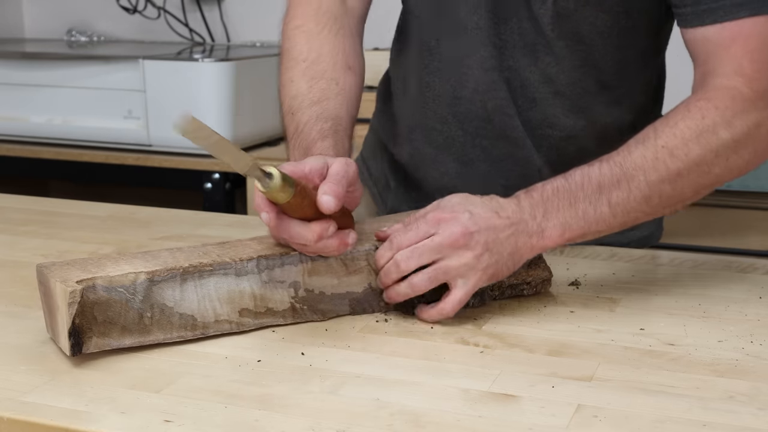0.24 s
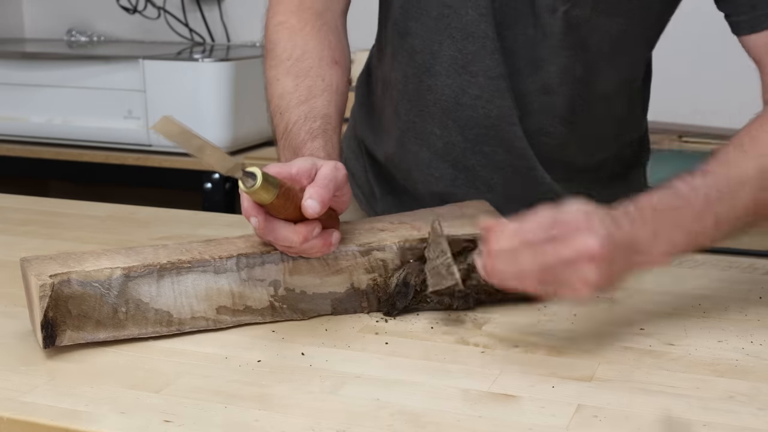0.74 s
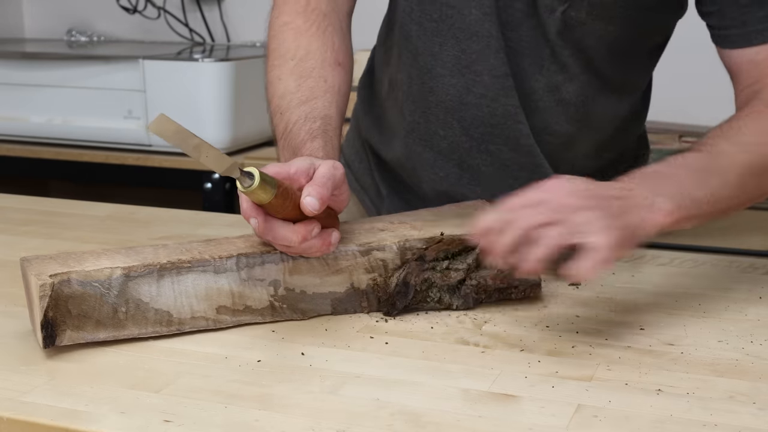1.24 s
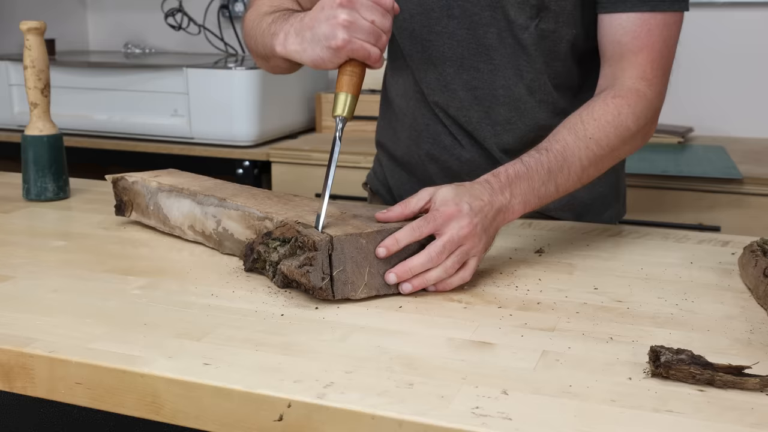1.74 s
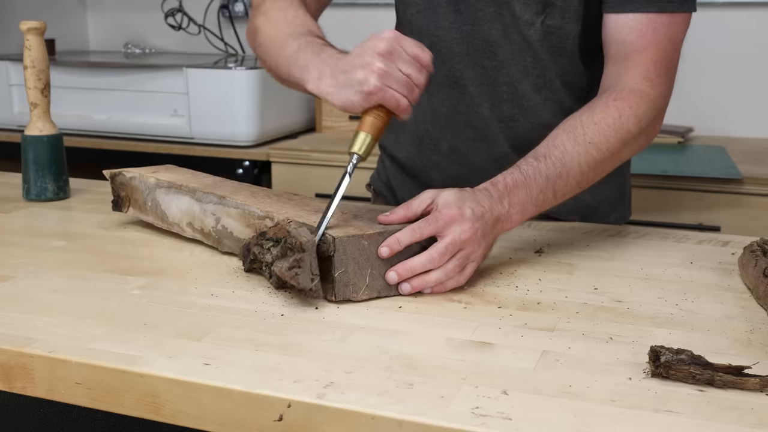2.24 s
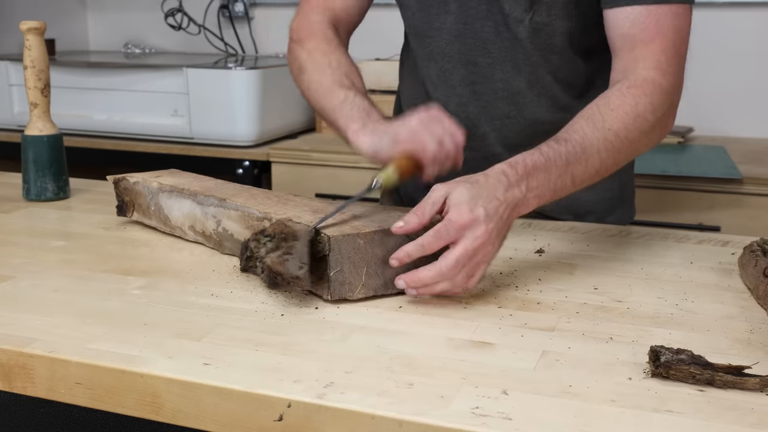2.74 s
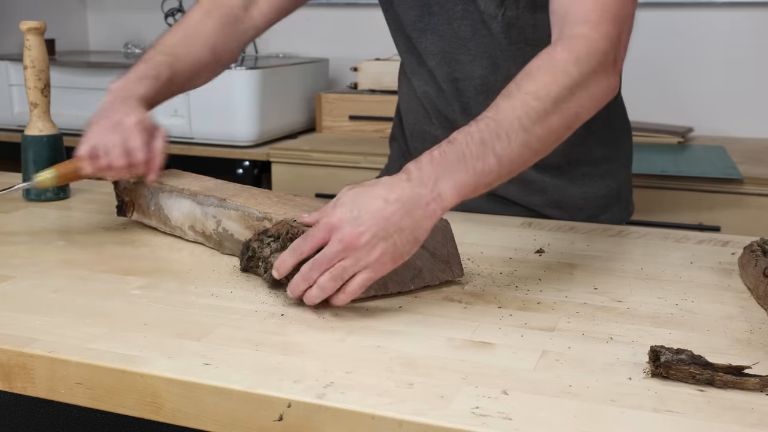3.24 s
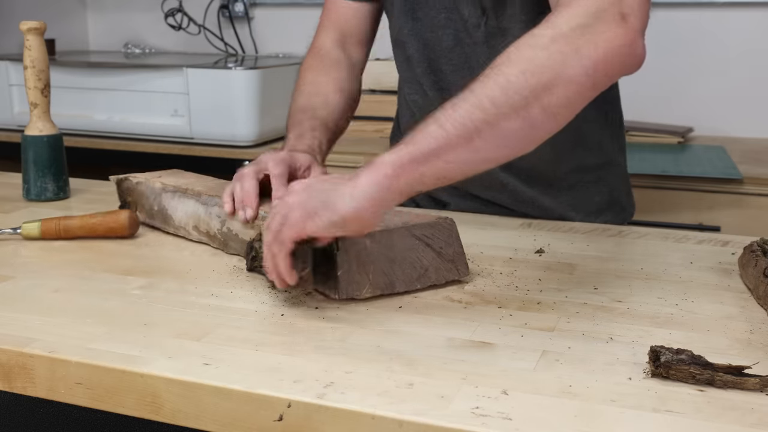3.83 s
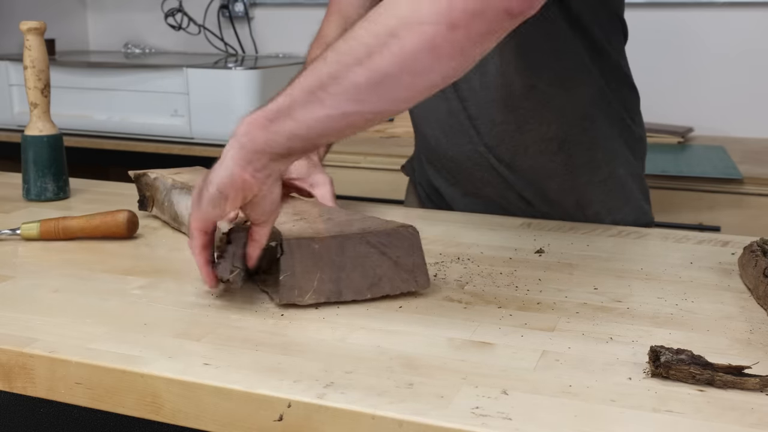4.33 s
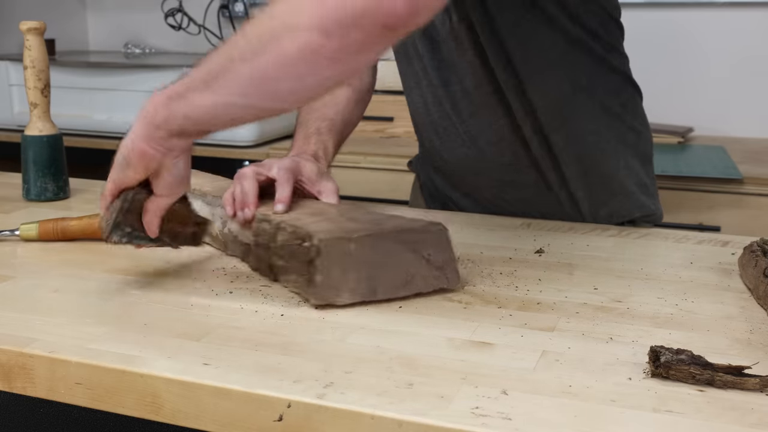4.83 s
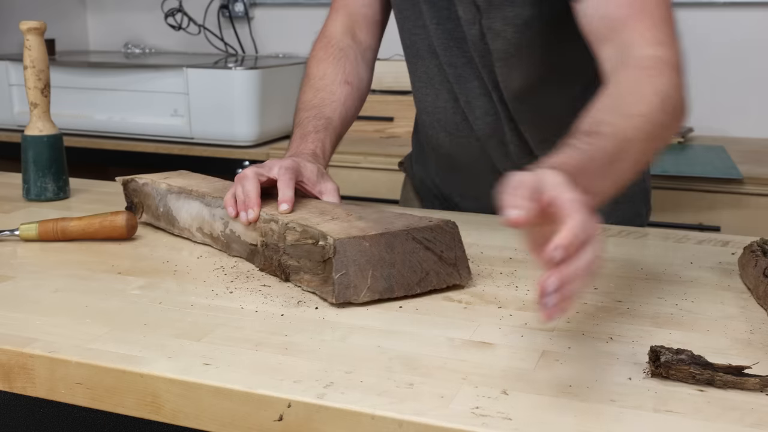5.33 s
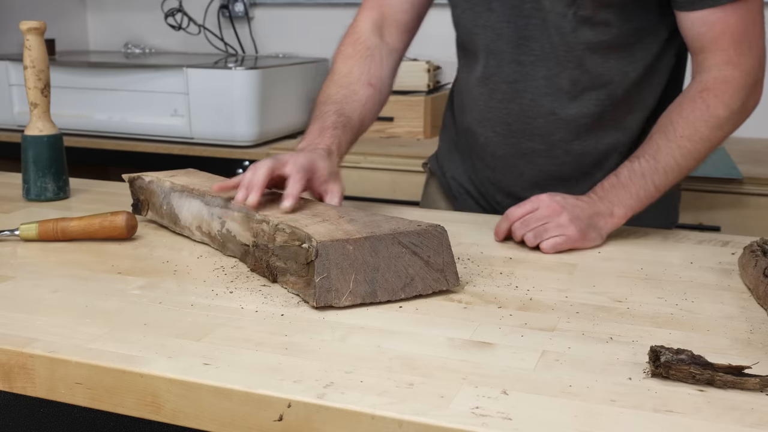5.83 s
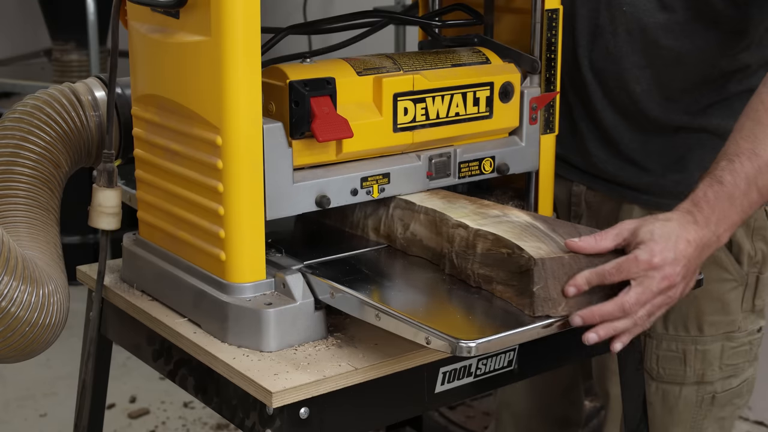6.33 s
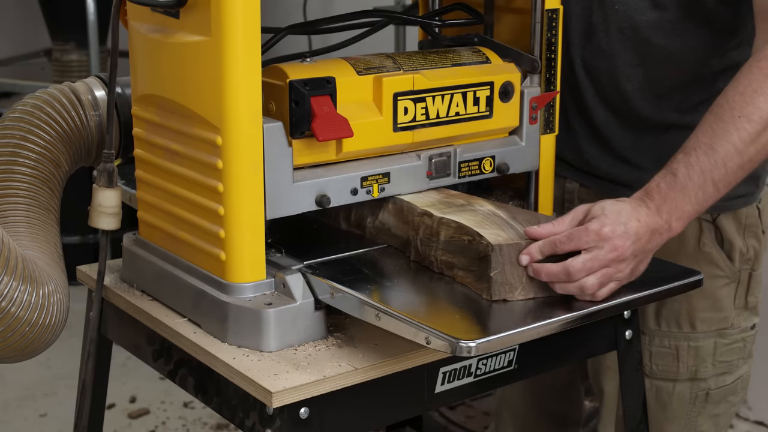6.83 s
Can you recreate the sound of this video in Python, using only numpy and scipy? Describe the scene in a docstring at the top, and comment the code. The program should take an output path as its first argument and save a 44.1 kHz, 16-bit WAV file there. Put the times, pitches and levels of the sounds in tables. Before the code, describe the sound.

In a quiet workshop, heard close up, hands rub over a log and bark breaks off with sharp, dry snaps at about 0.6 seconds. From 1.5 to 1.8 seconds the log knocks on a wooden workbench, with two small ticks of a steel chisel. A longer crackling, splintering tear follows from 2.1 to 2.5 seconds, trailing crumbs. Around 3.4 to 3.9 seconds the chisel is put down and rocks with wooden knocks and a faint ring of the blade. Light scraping leads to another loud crack of bark at 4.7 seconds, then a faint squeak of skin on wood. At 5.7 seconds the tossed piece clatters on something hollow, as a thickness planer comes in with a motor whine and rushing air. At 6 seconds the log clunks in with a short squeal, and the whine sinks in pitch under load until the end, at about 7 seconds.

```python
"""Bark torn off a log, then a thickness planer

Bark is torn by hand and levered with a chisel off a log on a wooden workbench, close by.
Fibres snap and crumble as shaped noise bursts; log, chisel and a tossed slab ring as decaying modes.
Then a thickness planer comes in: harmonics of a shaft that slows as it takes the log, over rushing air."""
import sys
import numpy as np
from scipy import signal
from scipy.fft import rfft, irfft
from scipy.io import wavfile
from scipy.ndimage import uniform_filter1d

SR = 44100
rng = np.random.default_rng(int(sys.argv[2]) if len(sys.argv) > 2 else 0)


def unload_wav(signal):
    """Save mono or channel-first audio to the path in sys.argv[1] as 16-bit WAV at rate SR, clipped to [-1, 1]."""
    wavfile.write(
        sys.argv[1],
        SR,
        np.round(np.clip(np.atleast_2d(signal).T, -1, 1) * 32767).astype(np.int16),
    )


N = 311787
TIME = np.arange(N) / SR
AGE = np.arange(SR // 2) / SR  # time since a blow [s]
TOP_HZ = 16000  # upper limit of the sound
CONTACT_DB = -19  # click of a hard contact against the nominal level of its blow

# modes of the log on the bench: (frequency [Hz], level [dB], t60 [s])
BENCH_MODES = [(142, -12.5, 0.23), (205, -12.5, 0.065), (265, -8.5, 0.17), (325, 1, 0.2),
               (431.6, -2, 0.069), (465, -11.5, 0.5), (490.2, -6.5, 0.22), (662, -8, 0.12), (858, -2, 0.21),
               (1000, -11, 0.11), (1108, -7, 0.078)]
# dense higher modes of the timber: (frequency [Hz], level [dB])
TIMBER = [(40, -41), (200, -10.5), (500, -7), (1000, -5), (1400, -7), (2200, -10.5), (3500, -16),
          (7000, -29), (16000, -38.5)]


def undb(db):
    """Logarithmic level: decibels to amplitude gain."""
    return 10 ** (np.asarray(db) / 20)


def unit(x, seconds=None):
    """Effective value: scale to rms 1, over the whole sound or over its first moments."""
    end = int(seconds * SR) if seconds else None
    return x / np.sqrt(np.mean(x[:end] ** 2))


def add(out, s, x):
    """Superposition: mix x into out from time s."""
    i = max(int(s * SR), 0)
    out[i:i + len(x)] += x[:len(out) - i]


def fade(t60):
    """Exponential damping: a fall of 60 dB in t60 seconds."""
    return np.exp(-np.log(1000) * AGE / t60)


def rise(seconds):
    """Finite contact time: a smooth onset."""
    return 1 - np.exp(-(AGE / seconds) ** 2)


def colour(x, points, tilt_db=0):
    """Minimum-phase filtering through (Hz, dB) points, tilted in dB per octave."""
    hz, db = np.transpose(points)
    octave = np.log2(np.maximum(np.fft.rfftfreq(4096, 1 / SR), 10))
    level_db = np.interp(octave, np.log2(hz), db) + tilt_db * (octave - octave.mean())
    cepstrum = irfft(level_db * np.log(10) / 20)
    # folding the cepstrum onto positive times makes the filter causal
    half = len(cepstrum) // 2
    cepstrum[1:half] *= 2
    cepstrum[half + 1:] = 0
    impulse_response = irfft(np.exp(rfft(cepstrum)))
    return signal.fftconvolve(x, impulse_response)[:len(x)]


def lowpass(x, hz, order=2):
    """Maximally flat (Butterworth) low-pass."""
    return signal.sosfilt(signal.butter(order, min(hz, TOP_HZ), fs=SR, output="sos"), x)


def highpass(x, hz, order=2):
    """Maximally flat (Butterworth) high-pass."""
    return signal.sosfilt(signal.butter(order, hz, "high", fs=SR, output="sos"), x)


def ring(modes, scatter_db=2):
    """Modal superposition: each blow varies the strength, sign and slightly the pitch of every mode."""
    out = 0
    for hz, db, t60 in modes:
        strength = undb(db + scatter_db * rng.standard_normal()) * rng.choice([-1, 1])
        pitch = hz * (1 + 0.0048 * rng.standard_normal())
        out = out + strength * fade(t60) * np.sin(2 * np.pi * pitch * AGE)
    return out


def burst(t60, tail_t60, tail_db):
    """Double decay: a sharp burst of noise plus a longer tail at its own level."""
    return rng.standard_normal(len(AGE)) * (fade(t60) + undb(tail_db) * fade(tail_t60))


def walk(rate, n=N):
    """Band-limited chance: smoothed random steps with a spread near 1, n samples long."""
    k = int(SR / rate)
    steps = np.repeat(rng.standard_normal(n // k + 2), k)
    return np.sqrt(20 / 11) * uniform_filter1d(uniform_filter1d(steps, k), k)[:n]


def cracks():
    """Brittle fracture: a snap of milliseconds with a bright tick sets the slab ringing."""
    # bark snapping: (time [s], relative strength [dB], extra brightness [dB])
    fractures = [(0.5783, -23, 0), (0.593, -18.5, 2.5), (0.6025, -11.5, -4), (0.6195, -1, 4.5),
                 (0.632, -4, 8.5), (0.6575, -6, 6), (0.7299, -23, -9), (1.0807, -28, -0.5),
                 (1.157, -36.5, 3), (1.2659, -15.5, -5), (1.275, -28.5, -12), (2.1306, -13.5, -6),
                 (2.2822, -7, -10.5), (2.308, -7.5, 2.5), (2.319, -10, 0), (2.3581, -12.5, -0.5),
                 (2.3787, -8, 2.5), (2.3872, -1.5, 2.5), (2.4687, -6.5, 12), (2.4985, -4, -7.5),
                 (2.6476, -24, 3), (3.328, -31.5, 1.5), (3.632, -15, -1), (4.006, -27.5, 4.5),
                 (4.0874, -22.5, 5), (4.125, -26, 13), (4.1492, -29.5, 10), (4.3882, -40.5, 7.5),
                 (4.6209, -8, 0.5), (4.6485, -4.5, 11), (4.6777, 0, -10.5), (4.6948, -10, -2),
                 (4.74, -15.5, 11.5)]
    # colours of the breaking fibres: (frequency [Hz], level [dB])
    snap_colour = [(300, -36), (900, -16), (1500, -7.5), (2500, -1), (4500, -2), (6500, -7.5), (9000, -16),
                   (16000, -31.5)]
    tick_colour = [(2000, -25), (5000, -14), (7500, 4), (11000, 6), (16000, -4.5)]
    # a half-freed slab of bark: (frequency [Hz], level [dB], t60 [s])
    slab_modes = [(1172, 1, 0.038), (1150, -10, 0.023), (2440, -0.5, 0.021), (3894, -3, 0.011)]
    # at strength 0 dB, and dB per dB of strength: the tick shrinks less than the snap in small cracks
    tick_base_db, tick_growth = -27, 0.52
    ring_base_db, ring_growth = -30.5, 0.95
    free_slab_s, free_slab_db = 3.0, 11  # from here the slab is prised clear and rings this much louder
    out = np.zeros(N)
    for s, db, bright_db in fractures:
        snap = colour(burst(t60=0.0045, tail_t60=0.033, tail_db=-17.5) * rise(0.00037), snap_colour)
        snap = unit(snap, 0.00051) * undb(db - 14.0)
        tick = colour(burst(t60=0.007, tail_t60=0.016, tail_db=-15.5) * rise(0.00042), tick_colour)
        tick = unit(tick, 0.0013) * undb(tick_base_db + tick_growth * db + bright_db)
        ring_db = ring_base_db + ring_growth * db
        if s < free_slab_s:  # bark that still clings to the log gives a dull crunch with no clear pitch
            crunch = rng.standard_normal(len(AGE)) * fade(t60=0.037)
            slab = highpass(lowpass(crunch, 880), 1000, order=4)
        else:
            slab = ring(slab_modes)
            ring_db += free_slab_db
        add(out, s, snap + tick + unit(slab, 0.014) * undb(ring_db))
    return out


def crumbling():
    """Friction and tearing: rubbing loosens grit; a tear breaks more and leaves a dying trickle."""
    # fingers and blade rubbing over the bark: (start [s], end [s], level [dB], tilt [dB per octave])
    rubs = [(0.02, 0.285, -63.5, 2.5), (0.363, 0.424, -52, 0), (1.029, 1.16, -50, 2.5),
            (1.219, 1.277, -45.5, -2.5), (2.001, 2.044, -41, -6.5), (2.066, 2.157, -43, -1),
            (2.556, 2.763, -44, 1), (2.818, 2.884, -51.5, 4), (4.073, 4.271, -49, 8.5),
            (4.382, 4.502, -56.5, 9), (4.746, 4.873, -47.5, 0.5), (4.868, 4.929, -46, -3),
            (4.953, 5.021, -49, -2.5)]
    # strips of bark tearing loose: (start [s], end [s], level [dB])
    tears = [(0.629, 0.676, -27.5), (2.28, 2.515, -29.5), (4.681, 4.713, -23), (1.24, 1.28, -47.5)]
    tear_tilt_db = 0.8  # per octave
    # crumbs after each tear: length, overlap with its end, level before the fade
    trickle_s, trickle_lead_s, trickle_db = 0.072, 0.013, -47
    trickle_fade_db_per_s = 69.5
    out = np.zeros(N)
    for start, end, db, tilt_db in rubs:
        add(out, start, crumble(end - start, db, tilt_db, hiss=0.06))
    for start, end, db in tears:
        add(out, start, crumble(end - start, db, tear_tilt_db))
        add(out, start, splinters(end - start, db))
        trickle = crumble(trickle_s, trickle_db, tear_tilt_db)
        dying = undb(-trickle_fade_db_per_s * TIME[:len(trickle)])
        add(out, end - trickle_lead_s, trickle * dying)
    return out


def crumble(seconds, db, tilt_db, hiss=0.012):
    """Shot noise: tiny fractures ring flakes, in clumps as the bark gives way; the log rumbles low."""
    # colour of the crumbs: (frequency [Hz], level [dB])
    crumb_colour = [(200, -24), (700, -6.5), (1200, 1.5), (1750, -2), (2500, 2), (4500, -4), (7000, -3.5),
                    (11000, -15), (16000, -16)]
    n = int(max(seconds, .01) * SR)
    pressure = undb(3.9 * walk(110, n))
    rate = 1000 * undb(0.24 * (db + 27.5))  # harder tearing breaks more fibres a second, for each flake
    grit = 0
    for _ in range(3):
        size = np.minimum(rng.exponential(size=n), 4.5)
        grains = (rng.random(n) < rate / SR) * undb(3.5 * size) * rng.choice([-1, 1], n)
        flake = rng.standard_normal(len(AGE)) * fade(t60=0.0069)
        excitation = (grains + hiss * rng.standard_normal(n)) * pressure
        grit = grit + signal.fftconvolve(excitation, flake)[:n]
    swell = signal.windows.tukey(n, .4) * undb(db)
    rumble = lowpass(signal.fftconvolve(grit, ring(BENCH_MODES))[:n], 230)
    mixed = unit(colour(grit, crumb_colour, tilt_db)) + undb(-9.5) * unit(rumble)
    return highpass(mixed, 110) * swell


def splinters(seconds, db):
    """Independent fractures: fibres break at uneven moments, each with its own pitch and size."""
    per_second, level_db, scatter_db = 96, -0.5, 5.5  # rate, level against the tear, spread
    low_hz, high_hz, cycles = 1040, 8100, 36  # range of pitches; cycles in a 60 dB decay
    out = np.zeros(len(AGE))
    for when, length, size in rng.random((int(seconds * per_second), 3)):
        hz = high_hz * (low_hz / high_hz) ** length
        tone = np.sin(2 * np.pi * hz * AGE)
        snap = (tone + .5 * rng.standard_normal(len(AGE))) * fade(cycles / hz)
        add(out, when * seconds, snap * undb(db + level_db - scatter_db * np.log(size + 0.085)))
    return out


def knocks():
    """Impact excitation: the log knocks on the bench with a click; hands press it with dull thuds."""
    # the log striking the bench: (time [s], relative level [dB], contact hardness as a cut-off [Hz])
    strikes = [(0.387, -41.5, 1374), (0.658, -37, 1334), (1.267, -47, 2400), (1.514, -29.5, 2380),
               (1.529, -15, 1326), (1.678, -25, 1354), (1.689, -28.5, 1630), (1.767, -23.5, 1880),
               (2.088, -32.5, 1505), (2.387, -24, 1100), (2.498, -27.5, 1000), (4.682, -28, 733),
               (5.207, -43.5, 596)]
    # hands pressing the log and leaning on the bench: (time [s], relative level [dB], softness as a cut-off [Hz])
    thuds = [(0.277, -30, 264), (0.676, -29.5, 268), (0.774, -48, 70), (1.039, -34, 270), (1.800, -41, 129),
             (2.025, -28.5, 180.5), (2.085, -28.5, 220), (2.111, -24.5, 268), (2.720, -37, 158),
             (2.852, -43, 116), (3.603, -25.5, 217), (4.391, -37, 331.9), (4.709, -21, 297),
             (4.746, -27.5, 153), (5.528, -42, 400), (5.596, -37.5, 200)]
    out = np.zeros(N)
    for s, db, contact_hz in strikes:
        click = contact() * undb(db + CONTACT_DB)
        add(out, s, blow(BENCH_MODES, timber(), db, contact_hz) + click)
    for s, db, contact_hz in thuds:
        add(out, s, blow(BENCH_MODES, timber(), db, contact_hz))
    return out


def contact():
    """Hard impact: the brief click of two surfaces meeting."""
    click = burst(t60=0.0038, tail_t60=0.06, tail_db=-13.5)
    return unit(lowpass(click, 4170, order=3), 0.00094)


def timber():
    """High modal density: the upper modes of the wood around one striking place merge into noise."""
    brief = rng.standard_normal(len(AGE)) * fade(t60=0.011)
    lingering = lowpass(rng.standard_normal(len(AGE)), 2600) * fade(t60=0.18)
    return unit(colour(brief + undb(-11.0) * lingering, TIMBER), 0.016)


def blow(modes, upper, db, contact_hz):
    """Contact time sets bandwidth: a soft blow builds up slowly and reaches mainly the low modes."""
    body = unit(ring(modes), 0.02) + undb(-1.5) * upper
    body = body * (0.67 + fade(t60=0.06))  # much of the force is lost at once, the rest rings on
    softened = lowpass(body * rise(.5 / contact_hz), contact_hz, order=3)
    heard = highpass(softened, min(contact_hz / 2.7, 170))
    return unit(heard, .02) * undb(db - 5.0)


def chisel():
    """Coupled resonators: the edge pings on the log; put down, the handle rocks and jolts the blade."""
    # the steel edge touches the wood: (time [s], frequency [Hz], level [dB])
    pings = [(1.515, 4340, -34.5), (1.689, 5250, -24)]
    # the chisel put down and rocking: (time [s], relative level [dB], hardness as a cut-off [Hz], blade ring [dB])
    set_down = [(3.439, -19.5, 1020, -53), (3.633, -7, 2600, -40.5), (3.712, -18.5, 1600, -50.5),
                (3.724, -14, 1440, -45), (3.789, -9.5, 1310, -46.5), (3.796, -15, 1340, -33),
                (3.819, -15.5, 1200, -55.5), (3.842, -13.5, 1170, -41.5)]
    # handle on the bench, and blade: (frequency [Hz], level [dB], t60 [s])
    handle_modes = [(732, -5.5, 0.11), (771, -1, 0.16), (1330, -2.5, 0.049), (1484, -7.5, 0.044)]
    blade_modes = [(3184, 3.5, 0.12), (4720, -10.5, 0.15), (4880, -7, 0.1), (6860, -12, 0.07),
                   (11950, -13, 0.046)]
    out, upper = np.zeros(N), timber()
    for s, hz, db in pings:
        tone = np.sin(2 * np.pi * hz * AGE) * fade(t60=0.011)
        add(out, s, undb(db) * (tone + undb(-6) * highpass(contact(), 4400)))
    for s, db, contact_hz, blade_db in set_down:
        knock = blow(list(BENCH_MODES) + list(handle_modes), upper, db, contact_hz)
        click = contact() * undb(db + CONTACT_DB)
        add(out, s, knock + click + undb(blade_db) * ring(blade_modes))
    return out


def squeak():
    """Stick-slip friction: skin on smooth wood gives a rough, sliding tone and a weaker, lower partner."""
    # a hand on the wood: (time [s], pitch [Hz], level of the main tone [dB])
    glide = [(5.02, 4820, -68), (5.081, 5080, -54.5), (5.114, 4690, -63), (5.19, 4420, -66)]
    s, hz, db = np.transpose(glide)
    t = np.arange(s[0], s[-1], 1 / SR)
    phase = 2 * np.pi * np.cumsum(np.interp(t, s, hz)) / SR

    def rough(ratio):
        """Random amplitude modulation broadens a tone."""
        return unit(lowpass(rng.standard_normal(len(t)), 283) * np.sin(ratio * phase))

    tones = rough(1) + undb(-8.5) * rough(0.64)
    out = np.zeros(N)
    add(out, s[0], tones * undb(np.interp(t, s, db)) * signal.windows.tukey(len(t), .2))
    return out


def landing():
    """Repeated impact: the tossed slab bounces and clatters on something hollow, which rings."""
    # blows of the slab: (time [s], relative level [dB])
    bounces = [(5.6854, -20.5), (5.693, -5.5), (5.701, -3), (5.719, -12.5)]
    # the hollow body: (frequency [Hz], level [dB], t60 [s])
    hollow_modes = [(172, 2.5, 0.34), (316, 9.2, 0.084), (1247, 9.1, 0.096), (1452, 8.3, 0.15)]
    # colour of the clatter: (frequency [Hz], level [dB])
    clatter_colour = [(80, -34), (180, -8), (320, -4.5), (420, -20), (800, -2.5), (1400, 2), (2300, -6.5),
                      (3000, -16.5), (4200, -9), (8000, -18), (16000, -35)]
    out = np.zeros(N)
    for s, db in bounces:
        clatter = colour(burst(t60=0.035, tail_t60=0.29, tail_db=-4.5), clatter_colour)
        add(out, s, undb(db - 13.0) * unit(clatter, 0.0084))
    add(out, 5.694, undb(-27.5) * ring(hollow_modes, scatter_db=1) * rise(0.0051))
    return out


def planer():
    """Rotating source: shaft harmonics over rushing air; the log clunks in, squeals and loads the motor."""
    # shaft slowing under load: (time [s], rotation [Hz])
    shaft = [(6.015, 169.2), (6.16, 163.4), (6.3, 159.6), (6.5, 156), (6.75, 152.9), (7.06, 151.4)]
    # whine of the motor and its drive: (multiple of the shaft speed, relative level [dB])
    whine_partials = [(6, -16), (8, -12), (9, -7), (11, -15), (12, -11), (15, -13), (18, -12), (23, -14),
                      (23.77, -15), (24, -17), (63.4, -26)]
    # rush of air through the cutter head: (frequency [Hz], level [dB])
    air_colour = [(90, -46), (170, -4), (500, -5.5), (1000, -5.5), (1600, 6.5), (4000, 2.5), (6000, -7.5),
                  (10000, -16.5), (16000, -17.5)]
    # the planer fades in: (time [s], gain)
    entry = [(5.58, 0), (5.67, 0.25), (5.76, 0.85)]
    from_s = 5.5
    t = TIME[int(from_s * SR):]
    n = len(t)
    hz = np.interp(t, *np.transpose(shaft))
    turn = 2 * np.pi * np.cumsum(hz * (1 + 0.0005 * walk(39.5, n))) / SR

    def partial(k, db):
        """Amplitude modulation: one fluttering multiple of the shaft speed."""
        return undb(db + 2 * walk(25.04, n)) * np.sin(k * turn + 2 * np.pi * rng.random())

    fan = np.sin(3 * turn)
    whine = sum(partial(k, db) for k, db in whine_partials)
    # weaker harmonics fill the gaps
    whine = whine + sum(partial(k, -12 - 0.41 * k) for k in range(10, 42) if k not in dict(whine_partials))
    air, side = (unit(colour(rng.standard_normal(n), air_colour)) for _ in range(2))
    chop = 1 + 0.14 * np.sin(turn)  # the knives beat the air
    sound = fan * undb(-41.5 + walk(3.9, n)) + undb(-41.5) * whine + undb(-47) * air * chop
    for s, db in [(6.030, -29.5), (6.054, -37.5)]:
        clunk = colour(burst(t60=0.024, tail_t60=0.22, tail_db=13), TIMBER)
        add(sound, s - from_s, undb(db) * unit(clunk, 0.008))
    squeal = partial(30, 0) + partial(33, -4) + partial(21, -8) + partial(27, -9)
    squeal = squeal + sum(partial(k, -18) for k in range(48, 63, 3))
    bite = undb(-36) * squeal * (1 + .5 * walk(300, n)) + undb(-34.5) * highpass(air, 3800)
    sound += bite * np.interp(t, [6.02, 6.05, 6.13, 6.2], [0.055, 1, 0.53, 0.03])
    # slightly stronger on the right; air of opposite sign in the two channels adds width
    stereo = sound * undb([[-.4], [.4]]) + undb(-50.5) * side * np.array([[1], [-1]])
    return np.pad(stereo * np.interp(t, *np.transpose(entry)), ((0, 0), (N - n, 0)))


def room(x):
    """Reverberation: a short, faint workshop tail whose treble dies first."""
    low = highpass(lowpass(rng.standard_normal(len(AGE)), 990), 190) * fade(t60=0.57)
    high = rng.standard_normal(len(AGE)) * fade(t60=0.18)
    tail = (undb(-8.5) * low + high) * rise(0.0013)
    tail = tail / np.sqrt(np.sum(tail ** 2))
    return x + undb(-11) * signal.fftconvolve(x, tail)[:N]


def shop_air():
    """Background noise: the quiet air of the shop, wavering, fading out around 6.1 s."""
    # colour of the air: (frequency [Hz], level [dB])
    shop_colour = [(15, -50), (25, -16.5), (134, -9), (212, -2), (476, -11), (1400, -23.5), (12200, -34),
                   (16000, -38.5)]
    air = unit(colour(rng.standard_normal(N), shop_colour)) * undb(-63.5 + walk(8.9))
    return air * np.interp(TIME, [6.05, 6.17], [1, 0])


def scene():
    """Superposition of sources: bench work in the middle over shop air, then the planer."""
    bench = cracks() + crumbling() + knocks() + chisel() + squeak() + landing()
    return room(bench) + shop_air() + planer()


def record(dry):
    """Band limiting and saturation: drop the rumble, round the highest peaks and cut the top."""
    rounded = np.tanh(highpass(dry, 38))
    return signal.sosfilt(signal.ellip(8, .2, 70, TOP_HZ, fs=SR, output="sos"), rounded)


dry = scene()
out = record(dry)
unload_wav(out)
```